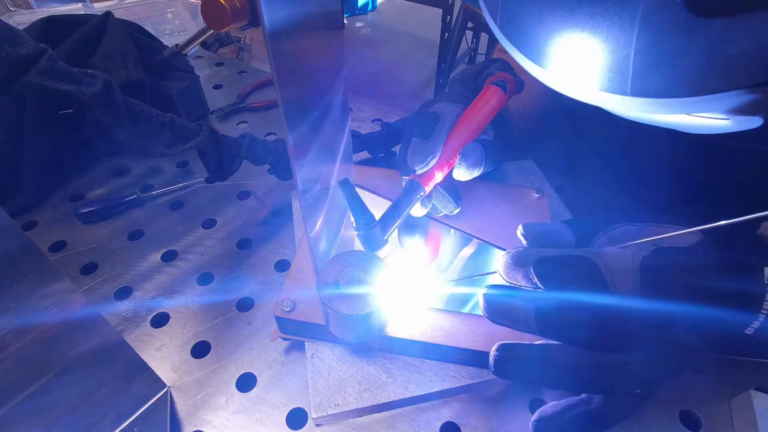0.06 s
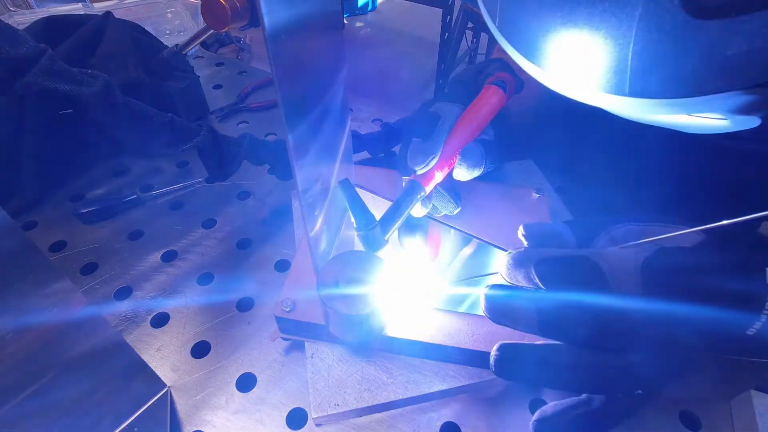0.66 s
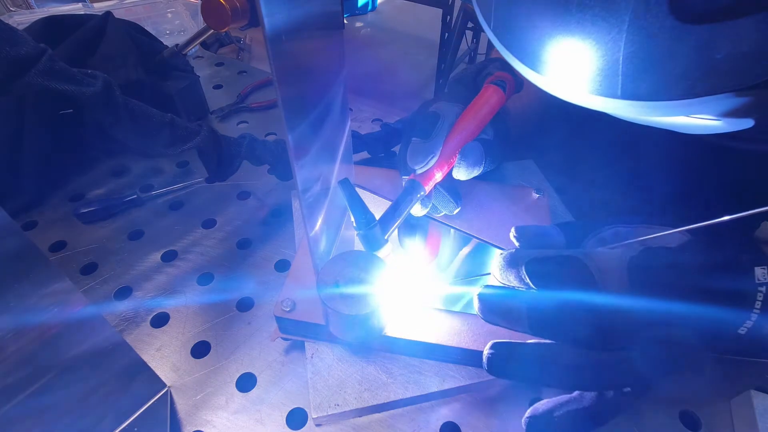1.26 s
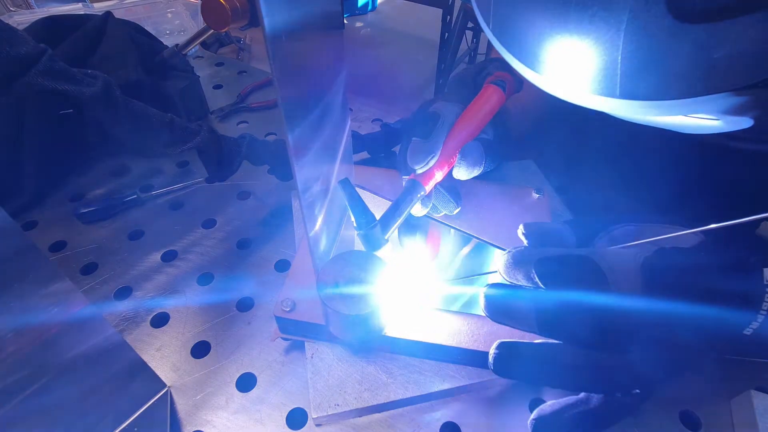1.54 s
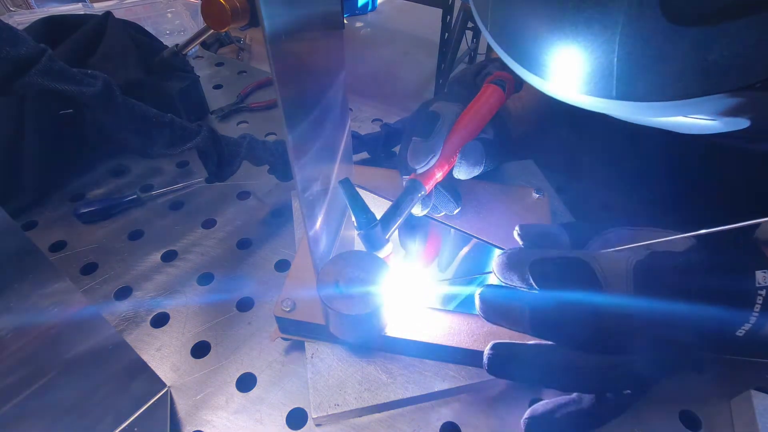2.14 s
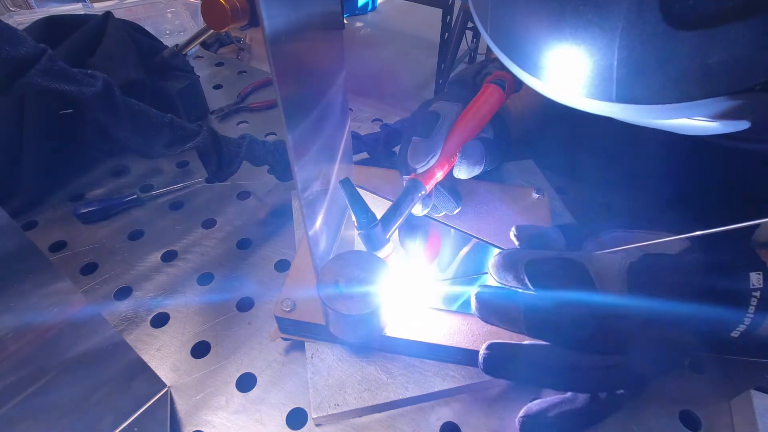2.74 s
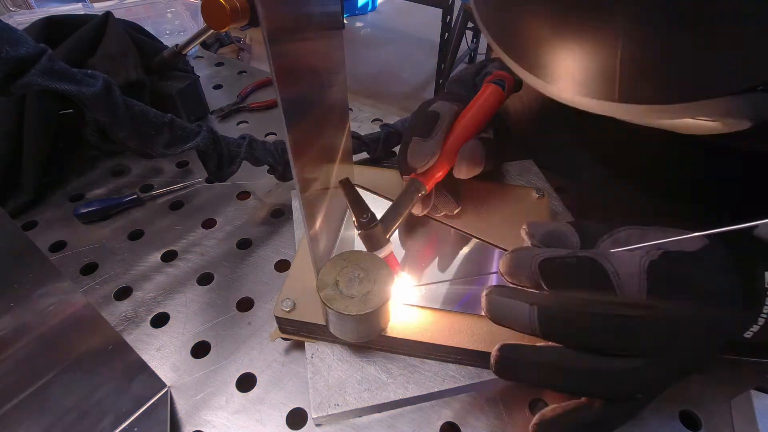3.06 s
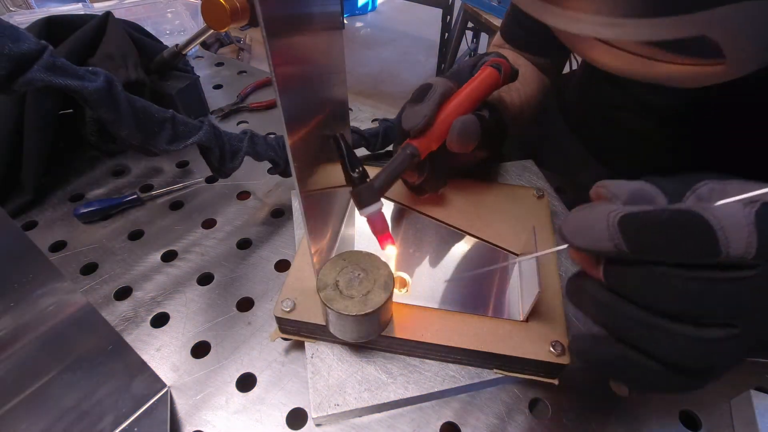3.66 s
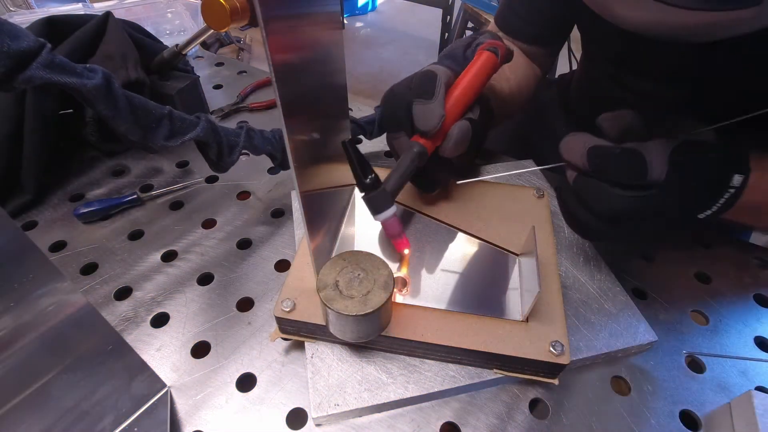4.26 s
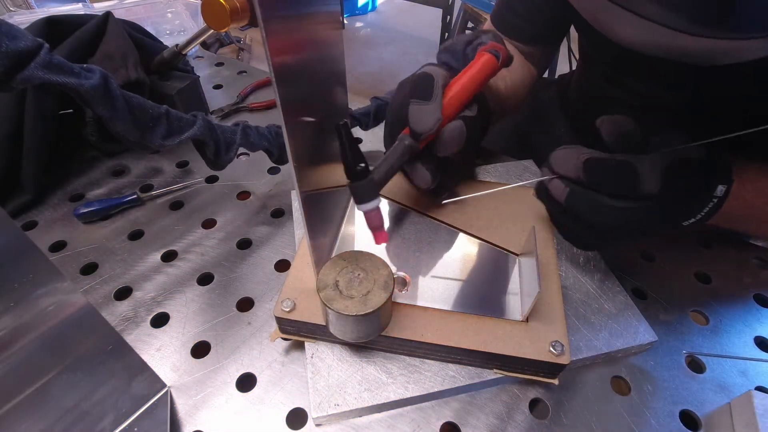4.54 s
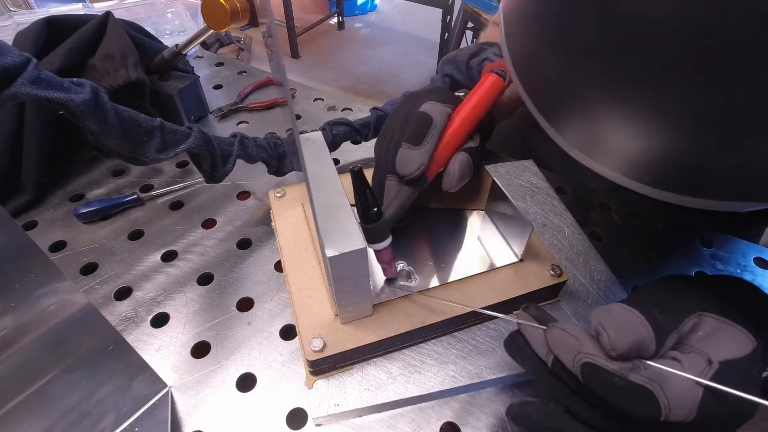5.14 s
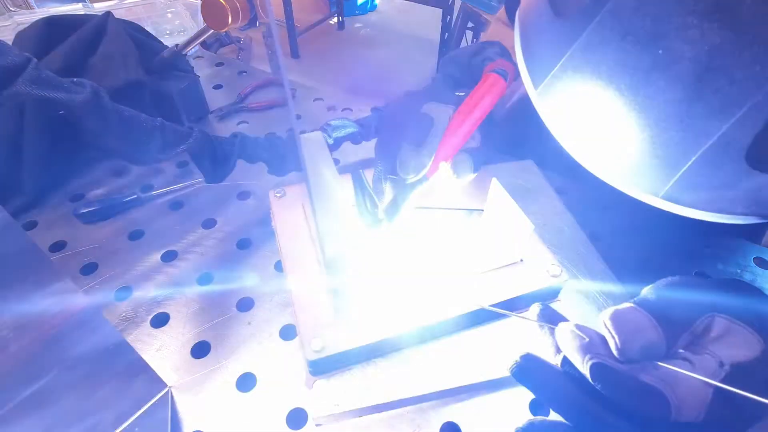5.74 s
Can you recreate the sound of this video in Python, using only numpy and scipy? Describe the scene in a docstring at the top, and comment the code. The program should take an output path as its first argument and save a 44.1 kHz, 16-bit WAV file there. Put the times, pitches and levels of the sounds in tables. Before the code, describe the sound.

From the start, a welding arc buzzes close by in a small workshop with little echo. The buzz is harsh and nearly constant in pitch, with a bright sizzle on top. It swells around 0.5 seconds, then turns more restless from about 1.3 seconds, fluttering and spitting. At about 3.2 seconds the arc stops abruptly, leaving the much quieter hum and rush of the welder's cooling fan and a very faint gas hiss. Light metal clinks come at about 3.8 and 4.6 seconds. Near 4.9 seconds the hiss cuts off and the fan steps up a little in level. At about 5.7 seconds there is a soft gush of gas, and at 5.8 seconds a sharp electric spark snaps. A new arc catches at once, with a slightly lower, harder, rattling buzz that lasts a brief moment until the end at about 5.9 seconds.

```python
"""AC TIG welding arc on a metal fitting, on a steel bench in a small workshop.
The arc relights at each current reversal, twice a cycle: a thump, a sharp snap and a puff of sizzle
that merge into a buzz. It stops; shielding gas hisses, the welder's fan hums, metal clinks twice;
then sparks strike a new arc at another corner."""
import sys
import numpy as np
from scipy import signal
from scipy.fft import rfft, irfft
from scipy.io import wavfile
from scipy.ndimage import map_coordinates

SR = 44100
rng = np.random.default_rng(int(sys.argv[2]) if len(sys.argv) > 2 else 0)


def store_wav(level_fs):
    """Save 16-bit WAV to argv[1]."""
    pcm = np.round(np.clip(np.atleast_2d(level_fs), -1, 1) * 32767)
    wavfile.write(sys.argv[1], SR, pcm.T.astype(np.int16))


N = 260631
TIME = np.arange(N) / SR
TOP_TREBLE_HZ = 10800


def from_db(db):
    """Decibels to gain."""
    return 10 ** (np.asarray(db) / 20)


def curves(rows, at=TIME):
    """Table columns interpolated at the given times."""
    t_s, *columns = np.transpose(rows)
    return [np.interp(at, t_s, c) for c in columns]


def through(x, response):
    """Convolve with a response scaled to unit energy."""
    return signal.fftconvolve(x, response / np.linalg.norm(response))[:N]


def coloured(x, spectrum, size=4096):
    """Minimum-phase filter from (f/Hz, relative level/dB); white noise keeps its power."""
    hz, db = np.transpose(spectrum)
    grid_hz = np.maximum(np.arange(size // 2 + 1) * SR / size, 1)
    gain = from_db(np.interp(np.log(grid_hz), np.log(hz), db))
    cepstrum = irfft(np.log(gain))
    fold = np.r_[1, np.full(size // 2 - 1, 2), np.zeros(size // 2)]
    return through(x, irfft(np.exp(rfft(cepstrum * fold))))


def shelf(x, kind, edge_hz, gain_db):
    """Zero-phase "low" or "high" shelf."""
    band = signal.sosfiltfilt(signal.butter(2, edge_hz, kind, fs=SR, output="sos"), x + 1e-18)
    return x + (from_db(gain_db) - 1) * band


def resonance(x, hz, width_hz, block=256):
    """Unity-gain band-pass with a movable centre."""
    r = np.exp(-np.pi * width_hz / SR)
    zeros = [(1 - r * r) / 2, 0, (r * r - 1) / 2]
    out, state = np.zeros(N), np.zeros(2)
    for i in range(0, N, block):
        poles = [1, -2 * r * np.cos(2 * np.pi * hz[i] / SR), r * r]
        out[i:i + block], state = signal.lfilter(zeros, poles, x[i:i + block], zi=state)
    return out


def clicks(times_s, heights, size=8):
    """Band-limited impulses at sub-sample times."""
    index = np.floor(times_s * SR).astype(int)[:, None] + np.arange(1 - size, size + 1)
    offset = index - times_s[:, None] * SR
    shapes = heights[:, None] * np.sinc(offset) * np.sinc(offset / size)
    return np.bincount(np.maximum(index, 0).ravel(), shapes.ravel(), N)[:N]


def pulse_train(times_s, rms_db):
    """Clicks scaled so that the train has the given rms level."""
    return clicks(times_s, from_db(rms_db) * np.sqrt(SR * np.mean(np.diff(times_s))))


def reversals(span_s, ac_hz, long_half_s):
    """Times and polarities of the current reversals; the long half-wave has constant length."""
    cycles = np.cumsum(ac_hz) / SR
    starts_s = np.interp(np.arange(*np.interp(span_s, TIME, cycles)), cycles, TIME)
    flips_s = starts_s + 1 / np.interp(starts_s, TIME, ac_hz) - long_half_s
    times_s = np.column_stack([starts_s, flips_s]).ravel()
    times_s = times_s[times_s < span_s[1]]
    return times_s, (-1) ** np.arange(len(times_s))


def torch_hold(at=TIME, shift_s=.05):
    """Arc settings as the hand glides from one torch position to the next."""
    # positions: start/s, unrest/0-1, snap re thump/dB, bass/dB, low sizzle/dB,
    # depth in corner/0-1, lifted f/Hz, swallowed f/Hz, top treble/dB
    holds = [(0, 0.53, -15, -2.5, -2.5, 0.49, 4230, 5160, -3),
             (.48, 0.2, -12.5, 1, -9.5, 0.46, 4750, 4050, -5.5),
             (.83, 0.26, -12, 3, -2, 0.9, 4480, 5720, 1.5),
             (1.3, 0.8, -12, 2.5, -5.5, 0.33, 3800, 5900, 1.5),
             (1.76, 1, -15.5, -2, 1, 0.47, 6140, 5580, -2), (2.719, 0.72, -15, 0, 1.5, 0.26, 6495, 4570, 1)]
    start_s, *columns = np.transpose(holds)
    moved = np.clip((at[:, None] - start_s[1:]) / shift_s + 1 / 2, 0, 1)
    return [c[0] + moved @ np.diff(c) for c in columns]


def flicker(half_width_s=.014):
    """Brief arc flickers: bell-shaped changes of level (dB) and AC rate (Hz)."""
    # flickers: t/s, thump change/dB, rate change/Hz
    flickers = [(.314, 0, 2.02), (1.462, -4, 0.097), (1.519, -3, -0.02), (1.643, -3.5, 0.079),
                (1.944, -1.5, 1.28), (1.991, -2.5, -0.43), (2.123, -3.5, -0.25), (2.245, 2.5, -0.55),
                (2.272, -3, 1.98), (2.387, -2, -0.14), (2.425, -2.5, 1.8), (2.625, 2, 0.05),
                (2.685, -0.5, 0.98), (2.804, 1, 1.56), (3.06, 1, 1.58)]
    t_s, change_db, surge_hz = np.transpose(flickers)
    bells = np.exp(-np.minimum(np.abs(TIME[:, None] - t_s) / half_width_s, 10) ** 2)
    return bells @ change_db, bells @ surge_hz


def sizzle(times_s, level_db, puff_s):
    """Each relighting throws out a short noise puff with a weak tail."""
    t = TIME[:512]
    puff = t / puff_s * np.exp(-t / puff_s) + .018 * np.exp(-t / .0035)
    puff_energy = from_db(level_db) ** 2 * SR * np.mean(np.diff(times_s))
    energy = np.bincount((times_s * SR).astype(int), puff_energy, N)[:N]
    power = signal.fftconvolve(energy, puff / puff.sum())[:N]
    return np.sqrt(np.abs(power)) * rng.standard_normal(N)


def snap(times_s, level_db, colours, heat_lead_s):
    """The steep edge of each relighting rings, with one colour per polarity."""
    hz, *polarity_db = np.transpose(colours)
    out = 0
    for k, db in enumerate(polarity_db):
        edges = pulse_train(times_s[k::2] - k * heat_lead_s, level_db[k::2])
        out = out + coloured(edges, np.column_stack([hz, db]))
    return out / np.sqrt(2)


def corner(x, lift_db=7):
    """The corner round the arc rings in one band, cancels another and shades the top treble."""
    *_, depth, lifted_hz, swallowed_hz, top_db = torch_hold()
    depth = np.clip(depth, 0, 1)
    x = shelf(x, "high", TOP_TREBLE_HZ, top_db)
    x = x - depth * resonance(x, swallowed_hz, width_hz=1500)
    return x + depth * from_db(lift_db) * resonance(x, lifted_hz, width_hz=650)


def first_arc(hop_db=1.5, hop_chance=.2, scatter_db=.9, spit_db=4, lean_db=1.5,
              roar_db=-21, restless_roar_db=7, crackle_db=-1):
    """A buzz that flutters as the arc hops between two spots on the pool."""
    # AC rate: t/s, f/Hz
    ac_rate = [(.5, 106.48), (.525, 104.05), (.82, 104.08), (.85, 104.45), (1.71, 104.4), (1.75, 106.47)]
    # arc strength: t/s, thump/dB, sizzle/dB
    strength = [(0, -29, -39.5), (0.22, -28, -38.5), (0.385, -29.5, -39), (0.44, -26.5, -36),
                (0.77, -26, -36), (0.83, -32, -41.5), (1.08, -30, -39.5), (1.25, -31, -40),
                (1.45, -29, -37.5), (1.85, -28.5, -38.5), (2.22, -27.5, -38.5), (2.52, -29, -38),
                (2.74, -30.5, -38), (2.96, -28, -37), (3.15, -30.5, -37)]
    # thump spectrum: f/Hz, level/dB
    thump_colour = [(40, -40), (100, -11.5), (210, -10.5), (320, -11), (430, -7), (530, -5), (635, -0.5),
                    (740, -1.5), (835, -6.5), (950, -3), (1060, -2), (1260, -11.5), (1450, -34),
                    (3000, -37.5), (6000, -62.5)]
    # sizzle spectrum: f/Hz, level/dB
    sizzle_colour = [(900, -21.5), (1500, -8.5), (2200, -1.5), (2640, -4), (3100, 7), (3550, 1), (4830, -1),
                     (6100, -1), (7240, -4), (8300, 3.5), (9700, 2.5), (10600, -11.5), (14600, -14.5),
                     (16000, -31)]
    # snap spectrum per half-wave: f/Hz, stripping/dB, heating/dB
    snap_colour = [(1500, -35, -26.5), (1900, -21.5, -20.5), (2370, -7, -5.5), (2650, -22, -13),
                   (3080, 3.5, -7), (3400, -14.5, -17.5), (4000, -21, -24), (4800, -17, -19),
                   (5600, -23, -24), (6300, -17.5, -25), (7300, -35, -27), (8550, -23, -6),
                   (8950, -9.5, -8.5), (9670, 0, -12), (10060, -16, -4.5), (10500, -31.5, -21.5),
                   (11000, -22.5, -21.5), (11700, -38, -33.5), (16000, -42.5, -40)]
    # single spits: t/s, level re sizzle/dB
    spits = [(1.385, 3), (1.442, 1), (1.596, 4), (1.701, 6.5), (1.814, 2), (2.049, 5), (2.086, 1),
             (2.143, 5), (2.171, 4.5), (2.199, 8.5), (2.583, 0), (2.762, 9), (3.036, 2)]

    flicker_db, surge_hz = flicker()
    ac_hz = curves(ac_rate)[0] + surge_hz
    times_s, polarity = reversals(span_s=(.0015, 3.166), ac_hz=ac_hz, long_half_s=.005375)
    change_db = np.interp(times_s, TIME, flicker_db)
    thump_db, sizzle_db = curves(strength, times_s)
    thump_db += change_db
    sizzle_db += .72 * change_db
    unrest, snap_re_thump_db, *_ = torch_hold(times_s)
    unrest = np.clip(unrest, 0, 1)
    _, _, bass_db, low_sizzle_db, *_ = torch_hold()
    level_jitter, time_jitter, snap_jitter = rng.standard_normal((3, len(times_s)))
    spot = (-1) ** np.cumsum(rng.random(len(times_s)) < hop_chance)
    flutter_db = unrest * (hop_db * spot + scatter_db * level_jitter)

    # hot gas swells at once; turbulence follows
    swell = pulse_train(times_s + 25e-6 * unrest * time_jitter, thump_db + flutter_db)
    roar = sizzle(times_s, thump_db + roar_db + restless_roar_db * unrest, puff_s=.00067)
    thumps = shelf(coloured(swell + roar, thump_colour), "low", edge_hz=450, gain_db=bass_db)

    # a restless arc spits unevenly, harder on the oxide-stripping half-wave
    spitting_db = spit_db * np.sqrt(unrest) * rng.uniform(-.79, 1, len(times_s))
    spitting_db += lean_db * unrest * polarity
    for t_s, db in spits:
        spitting_db[np.argmin(np.abs(times_s - t_s))] = db
    puffs = sizzle(times_s + .00015, sizzle_db + spitting_db, puff_s=.00048)
    crackle = shelf(coloured(puffs, sizzle_colour), "low", edge_hz=3600, gain_db=low_sizzle_db)

    snap_db = thump_db + snap_re_thump_db + flutter_db / 2 + scatter_db * snap_jitter
    snaps = snap(times_s + .0005, snap_db, snap_colour, heat_lead_s=30e-6)
    return thumps + corner(snaps + from_db(crackle_db) * crackle)


def fan():
    """The welder's cooling fan: rushing air, slightly wavering motor and blade tones."""
    # fan levels: t/s, rush/dB, hum/dB
    levels = [(0, -55.5, -51), (3.3, -60.5, -59), (4.1, -61.5, -59), (4.905, -59, -57.5),
              (4.918, -53.5, -49), (5.4, -53.5, -50.5), (5.91, -51.5, -49)]
    # air spectrum: f/Hz, relative density/dB
    rush_colour = [(18, -59.5), (30, -34.5), (101, -8), (150, -19.5), (311, -7), (421, -13), (451, -6),
                   (484, -14), (869, -11.5), (1150, -19.5), (1320, -16.5), (1490, -32), (2060, -24.5),
                   (5900, -45), (8000, -50.5), (10400, -60.5), (17600, -120)]
    # tones: f/Hz, level re hum/dB
    tones = [(100.5, -34.5), (199.7, -16), (323, -12), (453.3, -4), (645.5, -19), (779, -19.5),
             (907, -15.5), (1361, -20)]
    rush_db, hum_db = curves(levels)
    waver_rad = .0015 * np.cumsum(rng.standard_normal((len(tones), N)), axis=1)
    hum = sum(np.sqrt(2) * from_db(db) * np.sin(2 * np.pi * hz * TIME + slip)
              for (hz, db), slip in zip(tones, waver_rad))
    rush = coloured(rng.standard_normal(N), rush_colour)
    return from_db(rush_db) * rush + from_db(hum_db) * hum


def shielding_gas(gain_db=2.5, flutter_db=1.2, flutter_hz=14, bounce_gain=.55, sound_m_per_s=343):
    """Argon hisses through the torch cup; its bounce off the plate sweeps as the torch moves."""
    # cup resonances: f/Hz, width/Hz, level/dB
    cup_modes = [(4080, 990, -3.5), (9100, 1600, -2.5), (11900, 1600, -9)]
    # torch travel: t/s, level/dB, bounce detour/m, top treble/dB
    swish = [(3.3, -77.5, .113, -2), (3.55, -77.5, .113, -3), (3.63, -79, 0.13, -6), (3.7, -80, 0.15, 2),
             (3.78, -78, .153, 2), (3.88, -79, 0.18, -2), (3.96, -84, .143, 3), (4.04, -81, .18, 0),
             (4.13, -75.5, 0.19, -4), (4.21, -82, .193, 0), (4.27, -78, .203, 1), (4.34, -79, .195, -2),
             (4.42, -76.5, 0.186, 5), (4.5, -80, 0.2, 1), (4.57, -78.5, 0.15, 3), (4.67, -75, 0.2, -4),
             (4.78, -81, 0.19, -3), (4.86, -81.5, .178, 4.5), (5.67, -78, .113, -1.5)]
    swish_db, detour_m, top_db = curves(swish)

    # the hiss cuts off abruptly as the background steps louder; gas gushes before the second weld
    hiss_stop_s, gush_start_s, ramp_s = 4.912, 5.672, .0077
    gush_db, fall_db_per_s = 17.5, 31
    hiss_gate = np.clip((hiss_stop_s - TIME) / ramp_s + 1 / 2, 0, 1)
    gush_age_s = np.maximum(TIME - gush_start_s, 0)
    gush = np.minimum(gush_age_s / ramp_s, 1) * from_db(gush_db - fall_db_per_s * gush_age_s)

    jet, hiss = rng.standard_normal(N), 0
    for hz, width_hz, db in cup_modes:
        flutter = np.interp(TIME * flutter_hz, np.arange(256), rng.standard_normal(256))
        centre_hz = np.full(N, hz)
        band = resonance(resonance(jet, centre_hz, width_hz), centre_hz, width_hz)
        hiss = hiss + from_db(db + flutter_db * flutter) * band
    hiss = shelf(hiss / np.std(hiss), "high", TOP_TREBLE_HZ, top_db)
    bounce = map_coordinates(hiss, [(TIME - detour_m / sound_m_per_s) * SR])
    swept = (hiss + bounce_gain * bounce) / np.hypot(1, bounce_gain)
    return (hiss_gate + gush) * from_db(gain_db + swish_db) * swept


def clinks(crack_db=-5, crack_t60_s=.096, lowpass_hz=6500):
    """Light metal-on-metal knocks: a short crack, and modes rung with random strength."""
    # knocks: t/s, level/dB
    knocks = [(3.799, -44), (4.563, -44), (4.59, -54)]
    # metal modes: f/Hz, level/dB, t60/s
    modes = [(700, -8, .1), (764, -11, .15), (845, -10, .2), (1044, -1, .22), (1150, -8, .08),
             (1260, -13, .12), (2266, -15, .12), (2600, -12, .04), (3058, -15, .12), (4200, -16, .07),
             (4520, -8, .088), (4996, -8, .11), (5550, -19, .08), (6900, -17, .07), (7700, -17, .06)]
    out, t = np.zeros(N), TIME[:SR // 2]
    for t_s, level_db in knocks:
        ring = 0
        for hz, db, t60_s in modes:
            envelope = from_db(db + rng.normal(0, 1) - 60 * t / t60_s)
            ring = ring + envelope * np.sin(2 * np.pi * (hz * t + rng.random()))
        crack = from_db(crack_db - 60 * t / crack_t60_s) * rng.standard_normal(len(t))
        out[round(t_s * SR):][:len(t)] += from_db(level_db) * (ring + crack)
    return signal.sosfilt(signal.butter(4, lowpass_hz, fs=SR, output="sos"), out + 1e-18)


def ignition():
    """High-voltage sparks jump the gap before the arc holds."""
    # sparks: t/s, level/dB
    sparks = [(5.78, -15), (5.782, 2.5), (5.7905, -4)]
    # spark spectrum: f/Hz, level/dB
    spark_colour = [(30, 5), (200, -5), (700, 12), (1200, 14), (1600, 2.5), (2800, 9), (4500, 3),
                    (5600, -12), (9000, -3.5), (12000, -30), (16000, -22)]
    t_s, db = np.transpose(sparks)
    return -coloured(clicks(t_s, from_db(db)), spark_colour)


def second_arc():
    """A fresh arc on cold metal, slower, steadier, harder: a rattle of snaps, little sizzle."""
    # arc course: t/s, AC rate/Hz, thump/dB, sizzle/dB, snap/dB
    course = [(5.8, 96.2, -29.5, -32, -34), (5.807, 96.2, -27, -41, -37.5), (5.91, 96.2, -27.5, -40, -35.5)]
    # thump spectrum: f/Hz, level/dB
    thump_colour = [(40, -31), (100, -22), (290, -10.5), (480, -9.5), (580, -3), (675, 0.5), (770, -3),
                    (865, -7), (960, 0), (1160, -1), (1300, -9.5), (1500, -18), (1850, -13), (2300, -49.5)]
    # sizzle spectrum: f/Hz, level/dB
    sizzle_colour = [(1100, -13), (2800, 0), (5200, 6), (7200, -12), (9000, 1), (10500, -13), (13000, -9),
                     (15500, -32)]
    # snap spectrum per half-wave: f/Hz, stripping/dB, heating/dB
    snap_colour = [(1100, -14, -21), (1780, -3, 0), (2220, -12, -11), (2700, 3, 7), (3200, 2, 6),
                   (3900, -2, -5), (4540, 11, -6), (5300, 6, 4), (5800, -10, -3), (6400, -12, -14),
                   (7440, -19, -18), (8550, 0, 7), (8900, -8, -8), (9500, -2, 3), (10100, -12, -13),
                   (13000, -14, -17), (15500, -41, -37)]
    times_s, _ = reversals(span_s=(5.7993, 5.91), ac_hz=curves(course)[0], long_half_s=.00605)
    _, thump_db, sizzle_db, snap_db = curves(course, times_s)
    thumps = coloured(pulse_train(times_s, thump_db), thump_colour)
    snaps = snap(times_s + .00032, snap_db, snap_colour, heat_lead_s=80e-6)
    crackle = coloured(sizzle(times_s, sizzle_db, puff_s=.00048), sizzle_colour)
    return thumps + snaps + crackle


def workshop(x, t60_s=.19, band_hz=(350, 7000)):
    """Echoes bounce between bench and walls, losing treble and bass."""
    echoes = 0
    for k, path_s in enumerate(np.geomspace(.0047, .037, 17)):
        t = np.arange(path_s, .5, path_s)
        signs = (-1) ** (k + np.arange(len(t)) * (k // 2))
        echoes = echoes + clicks(t, signs * from_db(-60 * t / t60_s))
    response = signal.lfilter(*signal.butter(1, band_hz, "band", fs=SR), echoes[:SR // 2])
    return through(x, response)


def scene(room_db=-20):
    """Arcs, sparks and knocks with their echoes, over fan and gas; mono."""
    near = first_arc() + second_arc() + ignition() + clinks()
    return (near + from_db(room_db) * workshop(near) + fan() + shielding_gas())[None]


def record(dry, cutoff_hz=15900):
    """Steep low-pass."""
    return signal.sosfilt(signal.ellip(10, .1, 80, cutoff_hz, fs=SR, output="sos"), dry)


dry = scene()
out = record(dry)
store_wav(out)
```